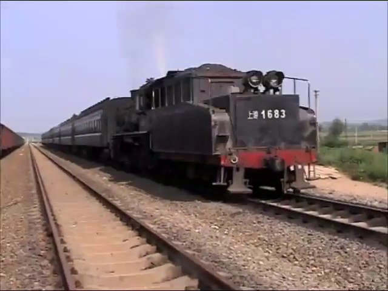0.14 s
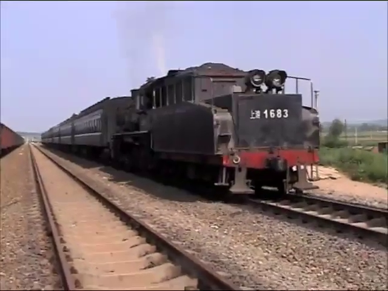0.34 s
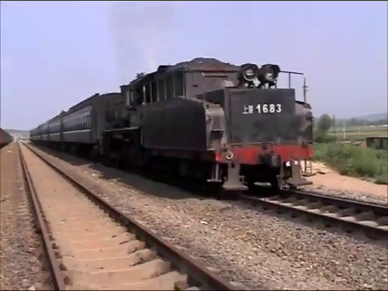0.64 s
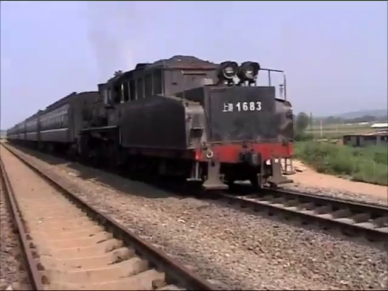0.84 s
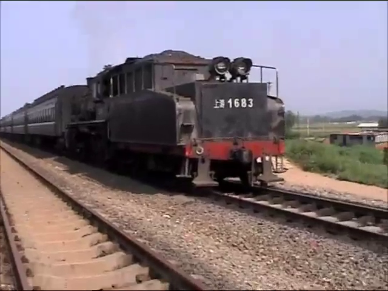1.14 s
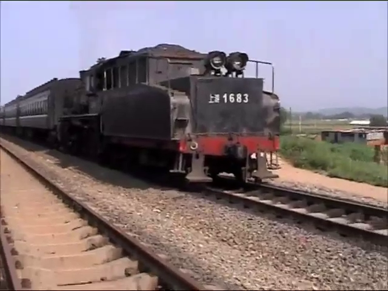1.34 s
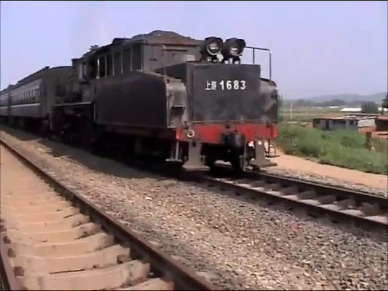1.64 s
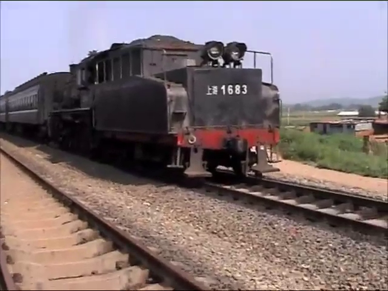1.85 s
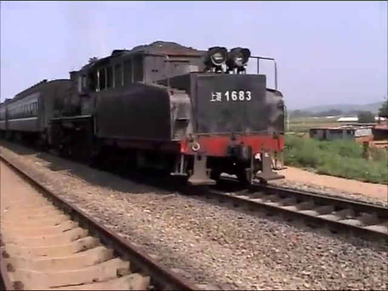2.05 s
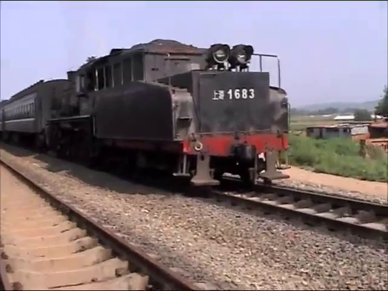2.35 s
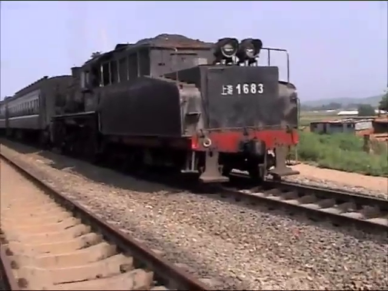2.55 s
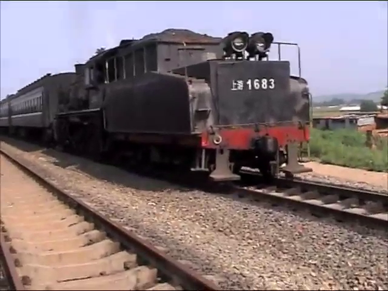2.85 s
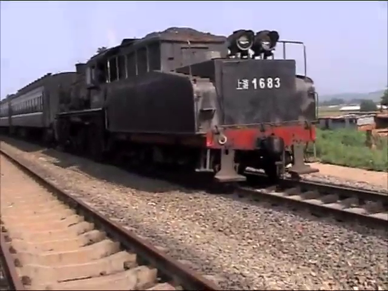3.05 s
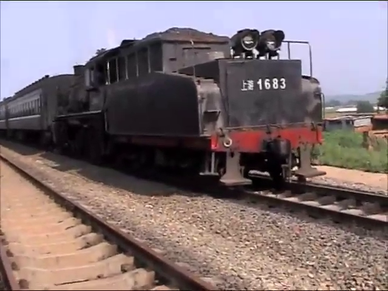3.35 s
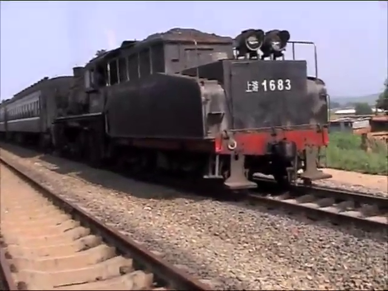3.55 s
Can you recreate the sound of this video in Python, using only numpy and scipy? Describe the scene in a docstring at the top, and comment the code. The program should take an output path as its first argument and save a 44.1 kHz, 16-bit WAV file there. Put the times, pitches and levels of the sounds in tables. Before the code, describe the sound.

A steam engine chuffs four times, growing louder, as leaking steam hisses steadily outdoors

```python
"""In open country, a steam locomotive pulls away with four exhaust beats that ring its chimney.
Each beat is shaped noise with a boom, thump and spit; hollow notes join it and a tail follows.
Leaking steam hisses and whistles throughout; soft puffs, low rumble and brief squeaks are added.
The left and right channels differ slightly, and the recorder turns down the loudest moments."""
import sys
import numpy as np
from scipy import signal
from scipy.fft import rfft, irfft
from scipy.io import wavfile
from scipy.ndimage import uniform_filter1d

SR = 44100
rng = np.random.default_rng(int(sys.argv[2]) if len(sys.argv) > 2 else 0)


def put_to_file(sound):
    """Save the sound as 16-bit audio at rate SR, in the file named by the first command-line argument."""
    columns = np.atleast_2d(sound).T  # one column per channel
    safe = np.clip(columns, -1, 1)
    whole_steps = np.round(safe * 32767)
    wavfile.write(sys.argv[1], SR, whole_steps.astype(np.int16))


N = 163170
T, HZ = np.arange(N) / SR, np.fft.rfftfreq(N, 1 / SR)

# In all tables, fall_s is the time to fall by 60 dB. Spectrum levels are relative.
# Low noise of running gear and fire, spectrum: pitch_hz, level_db (per Hz)
RUMBLE_SPECTRUM = [(20, -24), (60, -5.5), (110, 1), (170, 2), (220, -2.5), (285, 7.5), (360, -3),
                   (550, -10.5), (1000, -47), (4000, -66)]
# Strength of that noise over time: time_s, level_db
RUMBLE_LEVEL = [(0, -36.5), (.22, -41), (.55, -45), (1.2, -40.5), (1.7, -44.5), (2.2, -41.5), (2.6, -43),
                (3.2, -41.5), (3.7, -40)]

# Brief squeaks of the running gear: peak_s, pitch_hz, level_db
SQUEAKS = [(1.175, 1160, -33.5), (2.178, 770, -34), (3.215, 1263, -28)]
SQUEAK_RISE_S, SQUEAK_FALL_S, SQUEAK_WIDTH_HZ = 0.023, 0.22, 75

# Open-air tail: pitch_hz, fall_s
TAIL_FALL = [(60, 0.56), (130, 1.3), (300, 0.67), (600, 0.69), (1300, 0.62), (3000, 0.57), (9000, 0.48)]
TAIL_DB, TAIL_BUILD_S = -15.5, 0.042

# Leaking steam, spectrum: pitch_hz, level_db (per Hz)
HISS_SPECTRUM = [(200, -30), (400, -8.5), (580, -13.5), (700, -3), (830, -6), (1050, -1.5), (1170, -6.5),
                 (1260, -2.5), (1520, -10), (1750, -1), (1900, -5), (2100, -1), (2600, -3.5), (3550, 0),
                 (3950, -3), (4500, -5.5), (5500, -3.5), (6600, -1.5), (7700, -0.9), (8400, -5.5),
                 (9600, -8), (10800, -15), (12500, -20.5), (13500, -17.5), (14500, -37)]
# Changes in the hiss over time: time_s, treble_db, middle_db
HISS_SWELLS = [(0, -1, -1.5), (.25, -0.1, -2), (.53, 2.3, -2.5), (.75, 0, -1.7), (1.1, 1.5, -0.5),
               (1.75, 1, -0.7), (1.92, 6, 2), (2.08, 3, 0.5), (2.35, 4, -0.2), (2.65, 2.5, -0.5),
               (2.85, -1.5, 2), (3.0, 1, 1.5), (3.25, 0, 0.5), (3.7, -0.5, 1)]
HISS_DB, TREBLE_FROM_HZ = -25, 3900  # level before the swells
HISS_FLICKER_DB, HISS_FLICKER_HZ = 0.75, 28.3
# Reflections of the hiss from the engine's flank and the ballast
NEAR_DB, NEAR_LONGEST_S, NEAR_DULL_HZ = -8, 0.02, 4000

# Breathy whistle of the leak: time_s, pitch_hz, level_db (before flicker)
WHISTLE = [(0, 3826, -36.5), (0.401, 3800, -33.5), (.7, 3910, -38.5), (.98, 3860, -31), (1.2, 3924, -36),
           (1.799, 3915, -33.5), (2.299, 3955, -32), (2.7, 3884, -33.5), (3.0, 3795, -41), (3.7, 3915, -36)]
WHISTLE_WIDTH_HZ, WHISTLE_FLICKER_DB, WHISTLE_FLICKER_HZ = 420, 2, 24.9

# Soft puffs of steam: peak_s, rise_s, fall_s, level_db
PUFFS = [(.03, .03, 0.6, -35), (.857, 0.011, .16, -25), (.968, 0.018, 0.46, -18), (1.065, 0.014, 0.18, -27),
         (1.18, 0.022, 0.23, -32), (1.539, .04, 0.21, -33.5), (2.19, 0.053, 0.42, -25),
         (2.34, 0.027, 1, -35.5), (2.755, 0.0069, 0.28, -17), (2.89, 0.067, 0.75, -17.5),
         (2.985, 0.022, 0.51, -24.5), (3.2, 0.085, 0.62, -29), (3.32, .02, 0.42, -33),
         (3.645, 0.019, 0.36, -18.5)]
# Puff spectrum: pitch_hz, level_db (per Hz)
PUFF_SPECTRUM = [(60, -21), (150, -1), (300, -15), (520, -10), (760, -6), (1250, 0), (1520, -8.5),
                 (1950, -4.5), (3000, -13), (4000, -10.5), (5000, -31), (9000, -45), (15000, -76)]

# Hollow chimney notes: peak_s, pitch_hz (at the peak), level_db, rise_s, fall_s, glide_hz_per_s
HOWLS = [(.02, 188, -31, .05, 0.29, 0), (0.88, 1390, -21, 0.042, 0.33, -300),
         (0.91, 270, -24, 0.037, 0.17, 0.5), (.895, 358, -25.5, 0.1, 0.64, 0),
         (.93, 128, -19, 0.025, .15, 0), (.925, 938, -19, 0.054, .28, 0.5),
         (.9, 860, -20.5, 0.038, 0.27, 0), (0.91, 1025, -22.5, .025, .2, 1.5),
         (1.872, 355.5, -27.5, 0.05, 0.54, -0.5), (1.892, 288, -19.5, 0.046, .33, -0.5),
         (1.892, 795, -21.5, .03, .25, -300), (1.89, 1122, -23, .025, .25, 1.5),
         (1.922, 1279, -21, 0.03, 0.14, 300), (1.945, 137, -20.5, 0.015, 0.146, 0),
         (1.915, 82.7, -31, .03, .2, 0), (1.91, 240, -20.5, 0.028, 0.22, 0.5),
         (1.955, 1060, -27, .02, 0.2, -300), (2.78, 250, -17, 0.025, 0.23, -0.5),
         (2.792, 318, -16, 0.028, .22, 0.5), (2.799, 358, -17, 0.058, 0.34, -1),
         (2.802, 750, -13.5, 0.026, 0.29, 0), (2.795, 1003, -18, 0.022, 0.11, 301),
         (2.89, 300, -24, .05, 0.41, -200), (2.905, 790, -25.5, 0.029, 0.19, 0),
         (3.585, 785, -17, 0.022, 0.098, -1), (3.591, 1016, -17.5, 0.037, 0.22, 0),
         (3.588, 1232, -25, .035, 0.17, 0), (3.591, 498, -23, .03, 0.17, 0),
         (3.595, 254, -16.5, 0.055, .25, -0.5), (3.59, 1340, -24, 0.045, 0.26, 1)]
HOWL_WIDTH_HZ, HOWL_HOLD_S = 15.05, 0.0098

# Exhaust beats: peak_s, rise_s, hold_s, fall_s, level_db (before flutter), boom_db, thump_db,
# bright_db (treble tilt), spit_db
BEATS = [(0.91, 0.081, 0.046, 0.36, -14.5, -30, -52, 1.5, -50),
         (1.899, 0.055, 0.027, 0.43, -11.5, -27, -46, -2.5, -39),
         (2.794, 0.027, 0.011, 0.35, -8.5, -22, -27, -3, -19.5),
         (3.588, 0.039, 0.012, 0.21, -9, -18, -30, -5.5, -25)]
# Second surges through the chimney: peak_s, rise_s, fall_s, level_db
SURGES = [(.975, .025, 0.25, -26), (2.895, 0.05, 0.5, -19), (3.638, 0.015, 0.34, -17)]
# The bare exhaust jet, spectrum: pitch_hz, level_db (per Hz)
JET_SPECTRUM = [(30, -36), (80, -24), (103, -17), (130, -5.5), (160, -9), (205, -10), (245, -6.5),
                (375, -4.5), (420, -7.5), (455, -9), (590, -7.5), (720, -6.5), (1050, -8.5), (1370, -9.5),
                (1480, -17), (1850, -10), (2030, -13), (2600, -14), (3900, -16), (4600, -32), (7500, -19),
                (10000, -28.5), (15000, -70)]
# Chimney and smokebox resonances: pitch_hz, width_hz, lift_db (before CHIMNEY_DEPTH scales it)
CHIMNEY = [(250, 18, 7), (280, 24, 6), (322, 18, 4), (358, 22, 6), (498, 30, 7), (646, 20, 2), (709, 22, 5),
           (778, 32, 8), (935, 18, 3), (1012, 36, 8), (1132, 25, 4), (1227, 22, 5), (1292, 24, 5),
           (1376, 30, 7), (1605, 30, 5), (1765, 30, 4), (1870, 50, 4), (2095, 40, 8), (2300, 60, 4),
           (2385, 35, 5)]
CHIMNEY_DEPTH = 1.22
SURGE_BRIGHT_DB, BRIGHT_FROM_HZ = -6, 1600
FLUTTER_DB, FLUTTER_HZ = 1.6, 88
BOOM_HZ, BOOM_WIDTH_HZ, BOOM_LAG_S, BOOM_FALL_S = 124, 10.2, 0.016, 0.27
THUMP_HZ, THUMP_FALL_S = 33, 0.25
SPIT_HZ, SPIT_WIDTH_HZ, SPIT_FALL_S = 4930, 4500, 0.098  # sharp edge of the jet
RISE_POWER = 0.82  # shape of every pressure rise; 1 would be a straight line

# Eddies in the steam: depth, length and spread in pitch
EDDY_DB, PUFF_EDDY_DB, EDDY_S, EDDY_WIDTH_HZ = 2.1, 2.2, 0.018, 260

# Likeness of the noise in the left and right channels: pitch_hz, likeness (1 is identical)
CHANNEL_LIKENESS = [(30, .9), (130, .99), (300, .995), (600, .975), (1000, .985), (1500, .94), (2800, .965),
                    (3600, .985), (4500, .84), (5500, .87), (6400, .97), (7600, .88), (9100, .62),
                    (9800, .9), (10500, .97), (11300, .99), (12200, .78), (13000, .35), (14200, .6)]
# Phase lead of the left channel over the right: pitch_hz, lead_radians
CHANNEL_PHASE_LEAD = [(30, -.1), (100, -.33), (700, -.33), (1050, -.45), (1450, -.47), (1900, -.15),
                      (3800, 0), (4650, .35), (5300, .15), (6700, .05), (7100, .4), (7700, .5), (8600, 1.6),
                      (9750, 2.9), (10700, 3.12), (12500, 3.35), (13400, 5.8), (15000, 6.3)]
# Level balance, left channel minus right: pitch_hz, balance_db
CHANNEL_BALANCE = [(60, -.4), (250, -.2), (500, .3), (2000, .6), (3800, -.2), (4900, 2.5), (6000, .7),
                   (7000, -.4), (8300, -4.8), (9200, -4), (10000, -.3), (12000, .5), (13200, 3)]
BAND_EDGE_HZ = 14500


def amp(db):
    """Turns decibels into a multiplier."""
    return 10 ** (np.asarray(db) / 20)


def unit(x):
    """Scales a sound to an average strength (rms) of 1."""
    return x / np.sqrt(np.mean(x ** 2) + 1e-20)


def read(points, hz=HZ):
    """Reads between the rows of a table, with pitch on a logarithmic scale."""
    pitch, value = np.transpose(points)
    return np.interp(np.log(hz + 1), np.log(pitch + 1), value)


def bell(hz, width_hz):
    """Gain of one resonance: 1 at its pitch, less on either side."""
    return 1 / np.sqrt(1 + (2 * (HZ - hz) / width_hz) ** 2)


def noise(gain):
    """Turbulence with a given spectrum, partly alike in the left and right channels."""
    left, other = rfft(rng.standard_normal((2, N)))
    same = np.clip(read(CHANNEL_LIKENESS), -1, 1)
    right = same * left + np.sqrt(1 - same ** 2) * other
    return unit(irfft(np.array([left, right]) * gain, N))


def waver(rate_hz):
    """Random wavering of rms 1, mostly slower than the given rate."""
    keep_slow = (HZ > 2) / (1 + (HZ / rate_hz) ** 4)
    return unit(irfft(rfft(rng.standard_normal(N)) * keep_slow, N))


def blow(peak, rise, fall, hold=0):
    """Pressure builds as a valve opens, holds, then drains away."""
    build = np.clip(1 + (T - peak) / rise, 0, 1) ** RISE_POWER
    drain_db = -60 * np.maximum(T - peak - hold, 0) / fall
    return build * amp(drain_db)


def note(hz, width_hz, rough_db=1.0):
    """A resonance blown by turbulence: its phase wanders and its strength shakes."""
    wander = np.cumsum(rng.standard_normal(N)) * np.sqrt(2 * np.pi * width_hz / SR)
    smooth = signal.butter(2, width_hz, fs=SR, output="sos")
    drift = signal.sosfilt(smooth, np.exp(1j * wander)) * amp(rough_db * waver(width_hz))
    turn = 2 * np.pi * np.cumsum(hz * np.ones(N)) / SR  # hz may glide
    return unit((drift * np.exp(1j * turn)).real)


def ragged(x, depth_db, size=512):
    """Eddies lift and drop patches of the spectrum for a moment."""
    overlap = size * 3 // 4
    z = signal.stft(x, nperseg=size, noverlap=overlap)[2]
    frames = max(round(EDDY_S * SR * 4 / size), 1)
    bins = max(round(EDDY_WIDTH_HZ * size / SR), 1)
    patches = uniform_filter1d(rng.standard_normal(z.shape[1:]), bins, axis=0)
    patches = unit(uniform_filter1d(patches, frames, axis=1))
    shaken = z * amp(depth_db * patches)
    return unit(signal.istft(shaken, nperseg=size, noverlap=overlap)[1][:, :N])


def rumble():
    """Low noise of running gear and fire, with a changing level."""
    level_db = np.interp(T, *np.transpose(RUMBLE_LEVEL))
    return noise(amp(read(RUMBLE_SPECTRUM))) * amp(level_db)


def squeaks():
    """Steel scrapes briefly on steel: rough noise in one resonance."""
    out = 0
    for peak, hz, db in SQUEAKS:
        scrape = noise(bell(hz, SQUEAK_WIDTH_HZ) ** 2)
        out += amp(db) * scrape * blow(peak, SQUEAK_RISE_S, SQUEAK_FALL_S)
    return out


def countryside(x):
    """Scatter from the train and the ground, each band dying at its own speed."""
    hz, t, z = signal.stft(rng.standard_normal(SR), SR, nperseg=256)
    fade = amp(-60 * t / read(TAIL_FALL, hz)[:, None])
    build = np.minimum(t / TAIL_BUILD_S, 1)
    tail = signal.istft(z * fade * build, SR, nperseg=256)[1]
    return signal.fftconvolve(x, tail[None] / np.linalg.norm(tail), axes=1)[:, :N]


def reflected(count=12):
    """Ripple that a few dull nearby reflections put on a spectrum."""
    delays_s = rng.uniform(0.1028, 1, count) * NEAR_LONGEST_S
    strength = amp(NEAR_DB) / np.sqrt(count * (1 + (HZ / NEAR_DULL_HZ) ** 2))
    echoes = np.exp(-2j * np.pi * delays_s[:, None] * HZ).sum(0)
    return abs(1 + strength * echoes)


def leak():
    """Steady steam: a rushing middle, and a sharp treble that swells and sinks."""
    s, treble_db, middle_db = np.transpose(HISS_SWELLS)
    steam = amp(HISS_DB) * noise(amp(read(HISS_SPECTRUM)) * reflected())
    treble = irfft(rfft(steam) / (1 + (TREBLE_FROM_HZ / (HZ + 1)) ** 8), N)
    middle = steam - treble
    both = middle * amp(np.interp(T, s, middle_db)) + treble * amp(np.interp(T, s, treble_db))
    return both * amp(HISS_FLICKER_DB * waver(HISS_FLICKER_HZ))


def whistle():
    """A band of steam noise whose pitch drifts and whose strength flickers."""
    s, hz, db = np.transpose(WHISTLE)
    turn = 2 * np.pi * np.cumsum(np.interp(T, s, hz)) / SR
    half_width_hz = WHISTLE_WIDTH_HZ / 2
    band = waver(half_width_hz) * np.cos(turn) + waver(half_width_hz) * np.sin(turn)
    flicker_db = WHISTLE_FLICKER_DB * waver(WHISTLE_FLICKER_HZ)
    return band * amp(np.interp(T, s, db) + flicker_db)


def puffs():
    """Soft escapes of ragged steam; overlapping puffs add by power."""
    steam = ragged(noise(amp(read(PUFF_SPECTRUM))), PUFF_EDDY_DB)
    power = sum((amp(db) * blow(peak, rise, fall)) ** 2 for peak, rise, fall, db in PUFFS)
    return steam * np.sqrt(power)


def howls():
    """Hollow notes that steam draws from the chimney; some slide in pitch."""
    out = 0
    for peak, hz, db, rise, fall, glide in HOWLS:
        tone = note(hz + glide * (T - peak), HOWL_WIDTH_HZ, rough_db=1.2)
        out += amp(db) * tone * blow(peak, rise, fall, HOWL_HOLD_S)
    return out


def exhaust():
    """Ragged jets ring the chimney, each with a boom, a thump of air and a sharp spit; some surge again."""
    lift_db = sum(db * bell(hz, width) ** 2 for hz, width, db in CHIMNEY)
    pipe = amp(read(JET_SPECTRUM) + CHIMNEY_DEPTH * lift_db)
    treble = HZ ** 2 / (HZ ** 2 + BRIGHT_FROM_HZ ** 2)
    surge_steam = ragged(noise(pipe * amp(SURGE_BRIGHT_DB * treble)), EDDY_DB)
    out = surge_steam * sum(amp(db) * blow(peak, rise, fall) for peak, rise, fall, db in SURGES)
    for peak, rise, hold, fall, db, boom_db, thump_db, bright_db, spit_db in BEATS:
        jet = amp(db) * ragged(noise(pipe * amp(bright_db * treble)), EDDY_DB)
        out += jet * blow(peak, rise, fall, hold) * amp(FLUTTER_DB * waver(FLUTTER_HZ))
        boom = amp(boom_db) * note(BOOM_HZ, BOOM_WIDTH_HZ)
        out += boom * blow(peak + BOOM_LAG_S, rise, BOOM_FALL_S, hold)
        thump = amp(thump_db) * noise(1 / (1 + (HZ / THUMP_HZ) ** 4))
        out += thump * blow(peak, rise, THUMP_FALL_S)
        spit = amp(spit_db) * noise(bell(SPIT_HZ, SPIT_WIDTH_HZ) ** 2)
        out += spit * blow(peak, rise / 2, SPIT_FALL_S, hold)
    return out


def scene():
    """Adds all sources, then sets the level balance and phase lead of the two channels."""
    beats = exhaust() + howls()
    background = rumble() + squeaks() + amp(TAIL_DB) * countryside(beats)
    air = background + leak() + whistle() + puffs() + beats
    side = np.array([[.5], [-.5]])  # half of each difference goes to each channel
    channels = amp(side * read(CHANNEL_BALANCE)) * np.exp(1j * side * read(CHANNEL_PHASE_LEAD))
    return irfft(rfft(air) * channels, N)


def record(dry, threshold_db=-13, share=0.27, recover_db_per_s=22, ceiling=0.97):
    """Gain control turns down loud moments, peaks are rounded, then the band is limited."""
    power = abs(uniform_filter1d((dry ** 2).mean(0), size=500))
    power_db = 10 * np.log10(power + 1e-12)
    # The followed level jumps up with the sound but falls no faster than the recovery rate.
    recovery_db = T * recover_db_per_s
    held_db = np.maximum.accumulate(power_db + recovery_db) - recovery_db
    over_db = np.maximum(held_db - threshold_db, 0)
    smooth_over_db = signal.lfilter(np.ones(600), [600], over_db)
    ducked = dry / amp(share * smooth_over_db)
    rounded = ducked / (1 + (ducked / ceiling) ** 6) ** (1 / 6)
    band_limit = signal.firwin(301, BAND_EDGE_HZ, window=("kaiser", 9), fs=SR)
    return signal.oaconvolve(rounded, band_limit[None], "same")


dry = scene()
out = record(dry)
put_to_file(out)
```